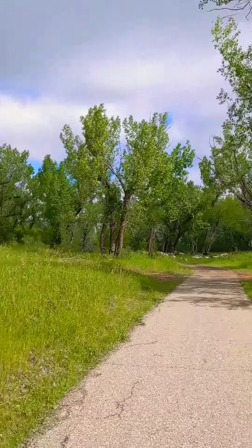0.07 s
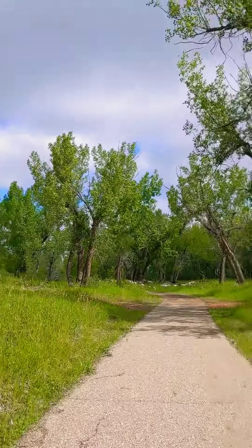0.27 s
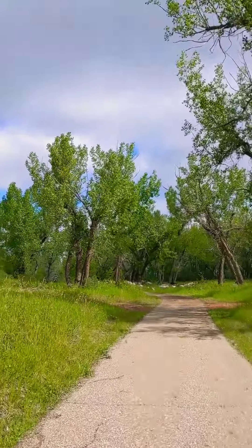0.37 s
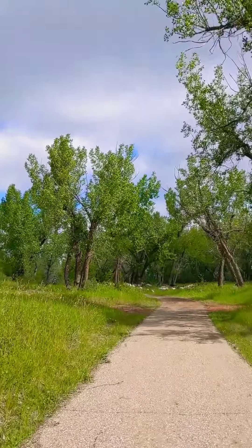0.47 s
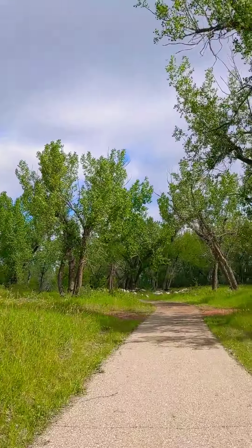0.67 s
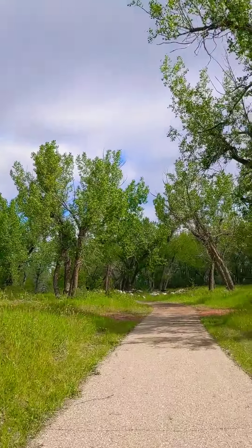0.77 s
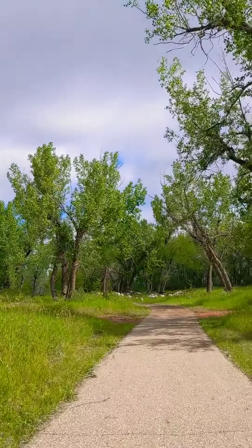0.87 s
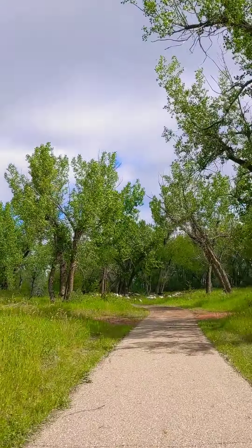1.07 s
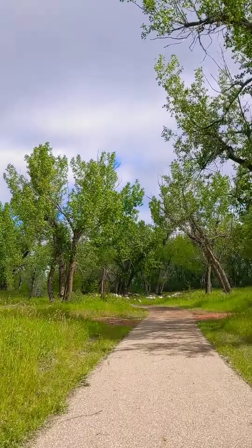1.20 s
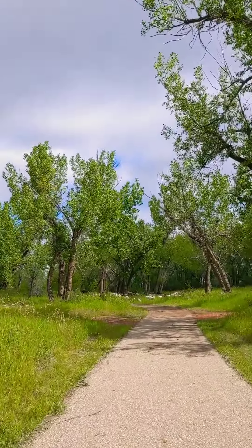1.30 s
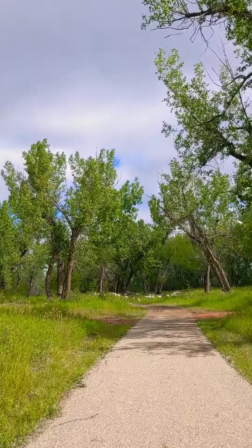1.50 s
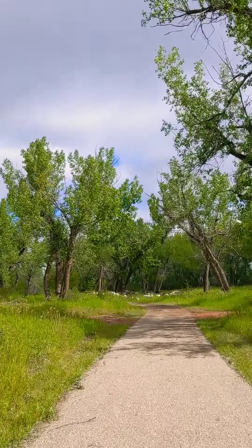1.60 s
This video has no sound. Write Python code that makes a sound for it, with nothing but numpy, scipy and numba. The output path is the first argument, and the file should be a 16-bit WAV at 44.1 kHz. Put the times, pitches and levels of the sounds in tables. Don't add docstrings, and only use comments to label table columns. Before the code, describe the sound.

A walker's shoes scrape and thump on gritty pavement while leaves rustle and a bird whistles

```python
import sys
import numpy as np
from scipy import signal
from scipy.fft import rfft, irfft
from scipy.io import wavfile
from scipy.ndimage import uniform_filter1d
from numba import njit

SR = 44100
rng = np.random.default_rng(int(sys.argv[2]) if len(sys.argv) > 2 else 0)


def volts_from_decibels(level):
    exponent = np.asarray(level, float) / 20
    return 10 ** exponent


def transcribe(signal):
    frames = np.atleast_2d(signal).T
    limited = np.clip(frames, -1, 1)
    pcm = np.round(limited * 32767).astype(np.int16)
    wavfile.write(sys.argv[1], SR, pcm)


N = 72765
T = np.arange(N) / SR

# frequency in Hz, spectral level in dB per Hz.
LEAVES_LEFT = [(150, -104.5), (500, -86.5), (2500, -92), (5500, -93), (7000, -102), (10000, -101),
               (13000, -106), (16000, -112)]
LEAVES_RIGHT = [(150, -89), (900, -83), (1700, -86.5), (2500, -83), (4000, -91), (5500, -91.5),
                (7200, -105), (13000, -101)]
# time in seconds, left gain in dB, right gain in dB.
TURN = [(0, 0, 0), (.7, 0, 0.5), (1.1, 0.5, 0), (1.4, 0, -1.5), (1.65, -1, -2)]
# time in seconds, left port level in dB, right port level in dB.
WIND = [(0, -56, -46.5), (.15, -56.5, -63.5), (.25, -42.5, -52), (.45, -51, -60.5), (.6, -46.5, -42),
        (.67, -54.5, -52.5), (.8, -48, -42), (.9, -48.5, -51), (1.1, -46.5, -51.5), (1.3, -45, -47),
        (1.499, -48, -57.5), (1.65, -48.5, -48.5)]
WIND_HZ, WIND_WIDTH_HZ, BUFFET_DB = 36.94, 47.5, 3
# time in seconds, left port level in dB, right port level in dB.
EDDIES = [(0, -65, -57), (.3, -68, -69), (.5, -69, -66.5), (.65, -56.5, -58), (.8, -68.5, -64.5),
          (.95, -61, -57.5), (1.08, -65, -63.5), (1.15, -67, -61.5), (1.23, -65.5, -59.5),
          (1.4, -72, -69.5), (1.65, -73, -69.5)]
EDDY_HZ, EDDY_WIDTH_HZ, EDDY_FLICKER_DB = 136.4, 191.4, 3

# start, peak and end in seconds, level in dB, brightness in Hz.
SCRAPES = [(.02, .065, 0.1073, -45, 2430), (.25, .275, 0.194, -50, 1970), (.31, .33, 0.401, -47.5, 2930),
           (.364, .3805, 0.3885, -29, 3360), (.38, .394, 0.4202, -36, 2430),
           (.425, .44, 0.459, -48.5, 2980), (.475, .49, 0.673, -50, 2440), (.59, .64, 0.713, -49, 3740),
           (.802, .815, 0.9, -49.5, 3350), (.895, .97, 0.998, -44.5, 2300), (.95, 1.04, 1.1048, -40, 2320),
           (1.196, 1.217, 1.2813, -43, 1810), (1.285, 1.345, 1.38, -44, 2520)]
# centre in Hz, width in Hz, level in dB.
SOLE_MODES = [(930, 1410, 0), (2110, 1060, -1), (4523, 490, -3.5)]
# start, peak and end in seconds, level in dB, centre in Hz.
HISSES = [(.02, .06, 0.199, -53.5, 9200), (.25, .275, 0.361, -59, 10960), (.31, .33, 0.37, -67.5, 9200),
          (.37, .381, 0.4283, -32.5, 10930), (.378, .395, 0.418, -32.5, 12690),
          (.425, .438, 0.497, -52, 11240), (.475, .505, 0.527, -46.5, 10000), (.5, .54, 0.6235, -42, 12590),
          (.585, .64, 0.7037, -46, 12360), (.802, .815, 0.839, -44.5, 12400),
          (.835, .85, 0.965, -54.5, 12180), (.895, .95, 1.01, -51, 12530), (.95, 1.035, 1.1215, -43, 11860),
          (1.208, 1.219, 1.252, -45.5, 9770), (1.285, 1.34, 1.389, -47, 12530)]
# start, peak and end in seconds, level in dB, centre in Hz.
SWISHES = [(.03, .12, 0.216, -57, 11200), (.35, .39, 0.78, -73.5, 9000), (.61, .64, 0.695, -67, 12000),
           (.93, 1.03, 1.07, -60, 10500), (1.14, 1.2, 1.26, -63, 9550), (1.53, 1.57, 1.47, -62, 10000)]
# start, peak and end in seconds, level in dB, last pitch in Hz.
GROANS = [
    (0.93, 1.036, 1.06, -46, 1184),
    (1.282, 1.326, 1.371, -41.5, 1064),
]
SCRAPE_WIDTH_HZ, HISS_WIDTH_HZ, SWISH_WIDTH_HZ = 4110, 9270, 8100
GROAN_RISE, GROAN_WIDTH_HZ = .25, 620
SCUFF_LEFT_DB, SCUFF_FLICKER_DB = -24, 1.4451
GRIT_PER_S, GRIT_SPREAD_DB = 9000, 1.4842

# time in seconds, peak in dB, pitch in Hz, signed strength, left port gain in dB.
SNAPS = [(.0244, -28.5, 693, 0.7, -13.5), (.0254, -42.5, 2150, 0.37, -26), (.1483, -14, 1081, 0.83, -21.5),
         (.2164, -26, 930, -0.97, -11), (0.3768, -17, 686, 0.76, -33), (0.39, -18, 339, 0.643, -28.5),
         (.3809, -12, 858, -0.68, -27), (.4258, -33, 1060, 1, -18), (.4853, -28, 1690, -1.025, -34.5),
         (0.5802, -30, 259.3, -1.156, -29.5), (0.5859, -29, 600, -0.894, -25),
         (.6364, -28.5, 1203, 0.853, -17), (.6742, -42, 520, -1.04, -3),
         (1.0512, -28.5, 1173, 0.975, -11.5), (1.212, -24.5, 1096, 0.76, -14.5),
         (1.2169, -19, 945, 0.707, -25), (1.2131, -33.5, 1010, 0.9, -11.5),
         (.3827, -20.5, 519, 0.486, -24.5), (.272, -36, 538, 0.74, -16.5), (.316, -35.5, 810, 1, -18.5),
         (1.2169, -26.5, 6930, -1.27, -30.5), (1.2186, -34.5, 402, -1.01, -27)]
SNAP_CYCLES, SNAP_SAG = .43, .08
# pitch in Hz, peak in dB, cycles to the peak.
CRACK = [(5094, -6, 0.479), (10000, -7, 1)]
CRACK_S, CRACK_LEFT_DB = .21584, -29.5
# time in seconds, peak in dB, pitch in Hz.
RINGS = [(.3698, -33, 2600), (.3730, -30, 2800), (.3756, -23, 3600), (.3784, -18, 5200), (.3787, -22, 2900),
         (.3812, -22, 4100), (.8822, -36, 2500), (.5050, -35, 2000), (.0252, -37, 3200),
         (1.2108, -32, 1800), (1.2120, -32, 2200), (1.2169, -29, 2300), (.6366, -36, 2300),
         (.4851, -36, 4500), (1.2005, -37, 2200)]
RING_CYCLES, RING_LEFT_DB = 0.84, -23.5
# time in seconds, peak in dB, pitch in Hz, signed strength.
THUMPS = [
    (0.3873, -8, 118.7, 0.794),
    (0.5824, -25, 73.4, 0.966),
    (1.2156, -26, 47.5, -0.85),
    (.8819, -29, 1530, -0.885),
    (.8839, -30.5, 505, -0.95),
    (1.2843, -32, 656, -0.91),
    (.3845, -27, 113.3, 0.901),
]
# time in seconds, peak in dB, pitch in Hz, signed strength.
SLAPS = [
    (.3945, -26, 164, 0.84),
    (.441, -30.5, 46.4, -1.13),
    (.518, -31.5, 112.5, -0.97),
    (.737, -28, 28.7, -0.854),
    (1.04, -29.5, 54.4, -0.953),
    (1.30, -27, 63.2, 0.825),
    (1.325, -26.5, 87.3, -0.726),
    (1.355, -30, 60, -0.78),
    (1.435, -31.5, 58, -1.16),
    (1.508, -30, 85, 0.883),
]
THUMP_CYCLES, THUMP_SAG = 0.341, 0.763

# start in seconds, length in seconds, first pitch in Hz, last pitch in Hz, level in dB.
CHIRPS = [
    (.655, 0.011, 3900, 3800, -63),
    (.703, 0.0072, 5500, 7300, -70),
    (.711, 0.0142, 7100, 5240, -58),
    (.727, 0.0172, 8100, 5460, -60.5),
    (.785, 0.0263, 4114, 3764, -60),
    (.877, 0.006, 5550, 7050, -63),
    (.888, 0.0088, 8000, 7400, -58),
    (.932, 0.026, 8100, 6100, -58),
    (1.376, 0.03, 4760, 5680, -65.5),
]
# end of the rise in seconds, rise in dB, fall in dB, top pitch in Hz.
SONG = [
    (1.057, -60, -62, 5600),
    (1.160, -50, -51, 5750),
    (1.262, -50, -50, 5750),
    (1.363, -49, -51, 5600),
    (1.463, -48, -48, 5850),
    (1.566, -50, -50, 5950),
]
RISE_S, RISE_HZ = .017, 4150
FALL_LEAD_S, FALL_S, FALL_HZ = .063, .027, (4750, 3250)
BIRD_SHADE_DB_PER_KHZ = 2
BIRD_RIGHT_DB, ECHO_DB, ECHO_T60_S = -2, -2, 1.1


@njit
def svf(x, hz, width):
    y, b, l = np.empty(len(x)), 0., 0.
    for i in range(len(x)):
        g, k = np.tan(np.pi * hz[i] / SR), width / hz[i]
        v = (b + g * (x[i] - l)) / (1 + g * (g + k))
        b, l, y[i] = 2 * v - b, l + 2 * g * v, k * v
    return y


def band(x, hz, width):
    return svf(x, hz + np.zeros(N), float(width))


def unit(x):
    return x / np.std(x)


def walk(rate):
    hold = int(SR / rate)
    levels = np.repeat(rng.standard_normal(N // hold + 1), hold)
    return unit(uniform_filter1d(uniform_filter1d(levels, hold), hold)[:N])


def swell(start, peak, end):
    return np.sin(np.pi / 2 * np.interp(T, [start, peak, end], [0, 1, 0])) ** 2


def knock(at, db, hz, sign, cycles, sag):
    c = np.maximum(T - at, 0) * hz
    turns = np.log1p(sag * c) / sag
    envelope = c / cycles * np.exp(1 - c / cycles)
    return -sign * volts_from_decibels(db) * envelope * np.sin(2 * np.pi * turns)


def leaves(colour):
    out, gust = 0, walk(2.6)
    hz, db = np.array(colour).T
    octave = np.log2(np.maximum(np.arange(N // 2 + 1) * SR / N, 1))
    tint = volts_from_decibels(np.interp(octave, np.log2(hz), db)) * np.sqrt(SR / 2)
    noise = rfft(rng.standard_normal(N)) * tint
    for centre in np.arange(6.5, 14.6, .5):
        share = np.clip(1 - 2 * np.abs(octave - centre), 0, 1)
        out = out + volts_from_decibels(.9 * gust + .8 * walk(15)) * irfft(noise * share, N)
    return out


def turbulence(rows, hz, width, second_width, flicker_db, rate):
    times, *ports = np.array(rows).T
    out = []
    for db in ports:
        level = volts_from_decibels(np.interp(T, times, db) + flicker_db * walk(rate))
        noise = band(rng.standard_normal(N), hz, width)
        out.append(level * unit(band(noise, hz, second_width)))
    return np.array(out)


def wind():
    return turbulence(WIND, WIND_HZ, WIND_WIDTH_HZ, 1.66 * WIND_WIDTH_HZ, BUFFET_DB, 14.044)


def flutter():
    return turbulence(EDDIES, EDDY_HZ, EDDY_WIDTH_HZ, EDDY_WIDTH_HZ, EDDY_FLICKER_DB, 29.95)


def grit():
    slips = rng.random(N) < GRIT_PER_S / SR
    size = volts_from_decibels(GRIT_SPREAD_DB * rng.exponential(size=N)) * slips
    return unit(size * rng.standard_normal(N)) + 0.527 * rng.standard_normal(N)


def rub(rows, width, steep, modes=()):
    shapes = [volts_from_decibels(row[3]) * swell(*row[:3]) + 1e-9 for row in rows]
    hz = sum(s * row[4] for s, row in zip(shapes, rows)) / sum(shapes)
    x = band(grit(), hz, width)
    x = unit(band(x, hz, width) if steep else x)
    x = x + sum(volts_from_decibels(db) * unit(band(grit(), f, w)) for f, w, db in modes)
    return sum(shapes) * volts_from_decibels(SCUFF_FLICKER_DB * walk(51.17)) * unit(x)


def groans():
    out, grains = 0, grit()
    for start, peak, end, db, hz in GROANS:
        pitch = hz * (1 - GROAN_RISE * np.interp(T, [start, end], [1, 0]) ** 2)
        tone = unit(band(band(grains, pitch, GROAN_WIDTH_HZ), pitch, GROAN_WIDTH_HZ))
        out = out + volts_from_decibels(db + .6 * walk(90)) * swell(start, peak, end) ** .3 * tone
    return out


def scuffs():
    right = rub(SCRAPES, SCRAPE_WIDTH_HZ, True, SOLE_MODES) + rub(HISSES, HISS_WIDTH_HZ, True) + groans()
    left = volts_from_decibels(SCUFF_LEFT_DB) * rub(SCRAPES, SCRAPE_WIDTH_HZ, False) + rub(SWISHES, SWISH_WIDTH_HZ, False)
    return np.array([left, right])


def crack(at):
    return sum(knock(at, db, hz, -1.106, cycles, 1e-3) for hz, db, cycles in CRACK)


def snaps():
    left, right = volts_from_decibels(CRACK_LEFT_DB) * crack(CRACK_S + 0.000324), crack(CRACK_S)
    for at, db, hz, sign, far_db in SNAPS:
        right = right + knock(at, db, hz, sign, SNAP_CYCLES, SNAP_SAG)
        left = left + knock(at + 0.00036, db + far_db, hz, sign, SNAP_CYCLES, SNAP_SAG)
    return np.array([left, right])


def rings():
    right = sum(knock(*row, 1, RING_CYCLES, SNAP_SAG) for row in RINGS)
    return np.array([volts_from_decibels(RING_LEFT_DB) * right, right])


def thumps():
    left = sum(knock(*row, THUMP_CYCLES, THUMP_SAG) for row in SLAPS)
    right = sum(knock(*row, THUMP_CYCLES, THUMP_SAG) for row in THUMPS)
    return np.array([left, right])


def whistle(start, length, first_hz, last_hz, db):
    glide = np.sin(np.pi / 2 * np.clip((T - start) / length, 0, 1)) ** 1.597
    hz = first_hz + (last_hz - first_hz) * glide
    shade = BIRD_SHADE_DB_PER_KHZ * (np.clip(hz, 3500, 6500) - 5000) / 1000 * np.array([[1], [-1]])
    peak, power = (.75, .6) if last_hz > first_hz else (.3, 1.1)
    shape = swell(start - .002, start + peak * length, start + length + .003) ** power
    return shape * volts_from_decibels(db + shade + 1.3 * walk(250)) * np.sin(2 * np.pi * np.cumsum(hz) / SR)


def echoes(x):
    u = T[:SR // 2]
    tail = rng.standard_normal((2, len(u))) * volts_from_decibels(-60 * u / ECHO_T60_S) * np.minimum(u / .03, 1)
    tail = tail / np.sqrt(np.sum(tail ** 2, axis=1, keepdims=True)) * volts_from_decibels(ECHO_DB)
    return signal.fftconvolve(x, tail, axes=1)[:, :N]


def birds():
    notes = CHIRPS + [(end - RISE_S, RISE_S, RISE_HZ, top, up) for end, up, _, top in SONG]
    notes = notes + [(end - FALL_LEAD_S, FALL_S, *FALL_HZ, down) for end, _, down, _ in SONG]
    song = sum(whistle(*note) for note in notes)
    return (song + echoes(song)) * volts_from_decibels(np.array([[0], [BIRD_RIGHT_DB]]))


def scene():
    times, *gains = np.array(TURN).T
    turn = volts_from_decibels(np.array([np.interp(T, times, db) for db in gains]))
    rustle = turn * np.array([leaves(LEAVES_LEFT), leaves(LEAVES_RIGHT)])
    feet = scuffs() + snaps() + rings() + thumps()
    return rustle + wind() + flutter() + feet + birds()


def band_limit(x):
    return signal.sosfilt(signal.butter(12, 16870, fs=SR, output="sos"), x)


def record(dry):
    bass_cut = signal.butter(2, 18, "high", fs=SR, output="sos")
    top_cut = signal.ellip(12, .3, 40, 15910, fs=SR, output="sos")
    mix = signal.sosfilt(top_cut, signal.sosfilt(bass_cut, dry))
    return band_limit(mix)


dry = scene()
out = record(dry)
transcribe(out)
```